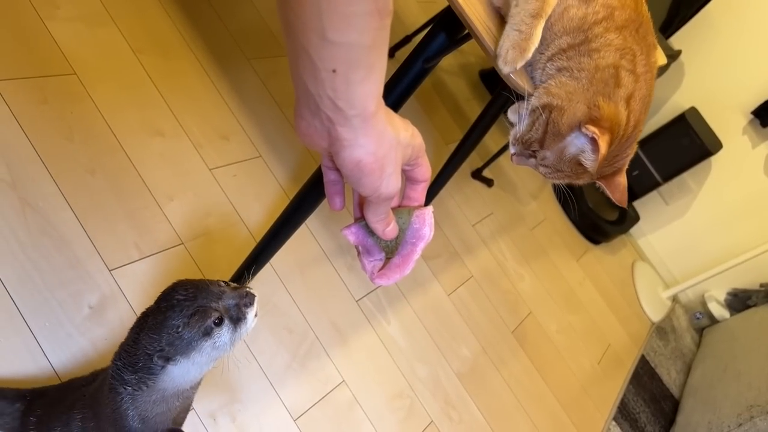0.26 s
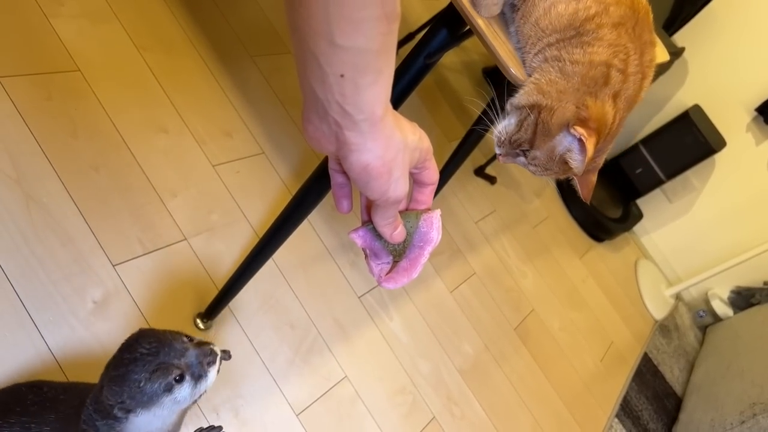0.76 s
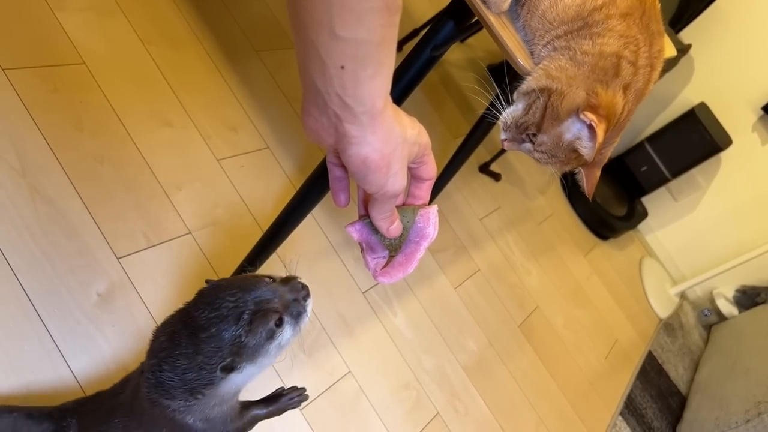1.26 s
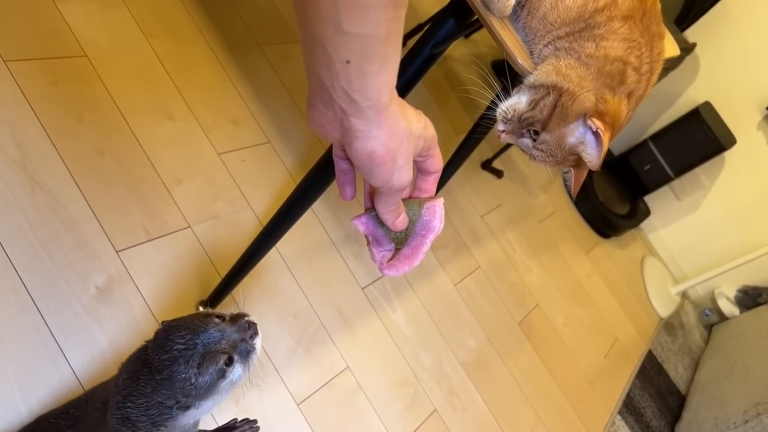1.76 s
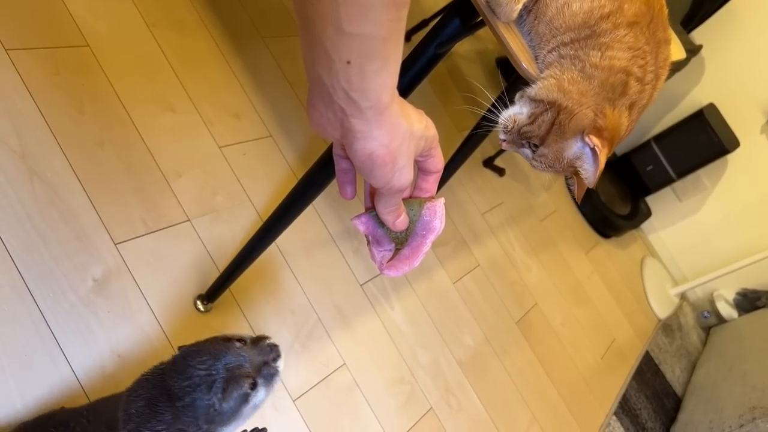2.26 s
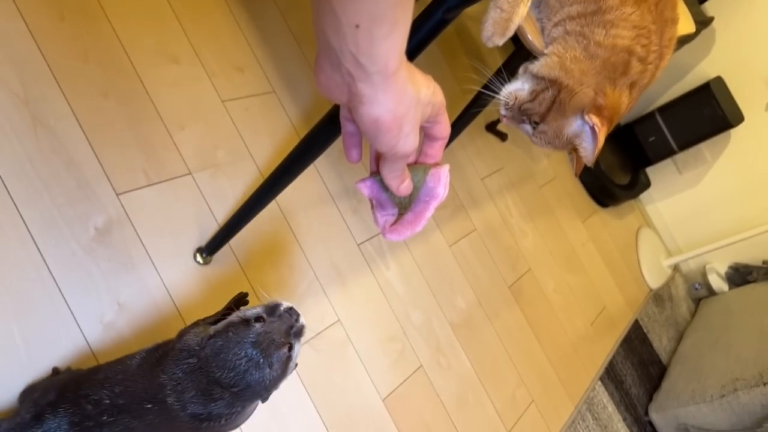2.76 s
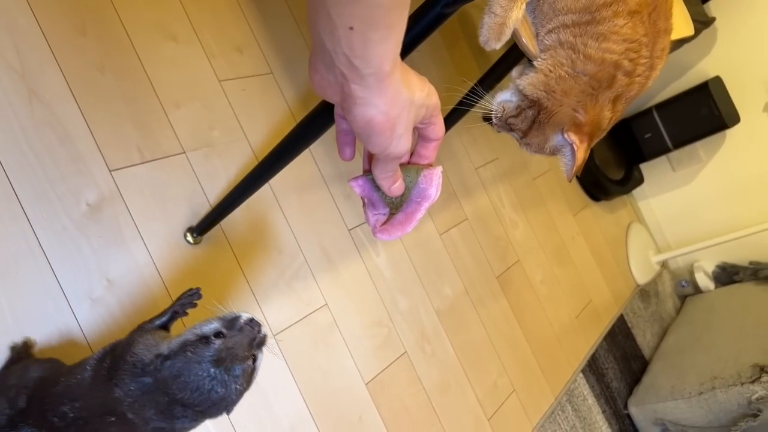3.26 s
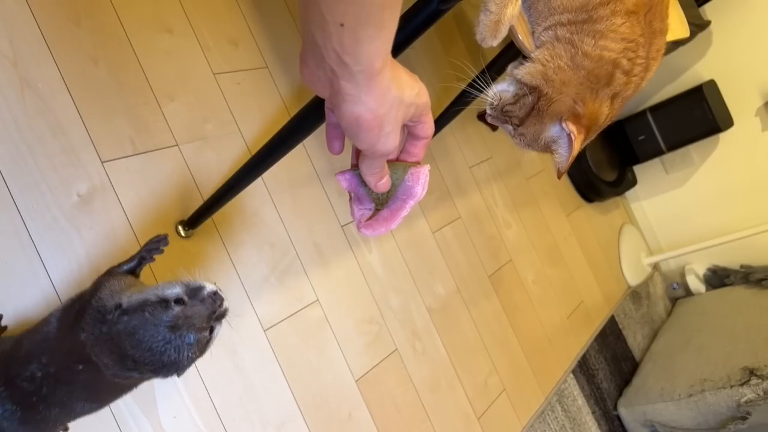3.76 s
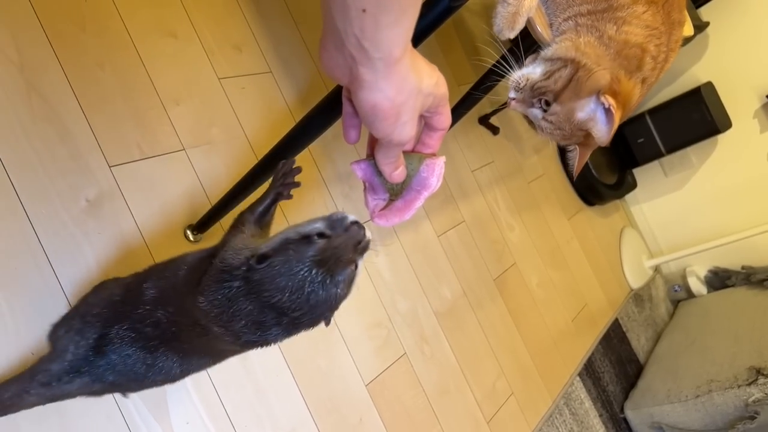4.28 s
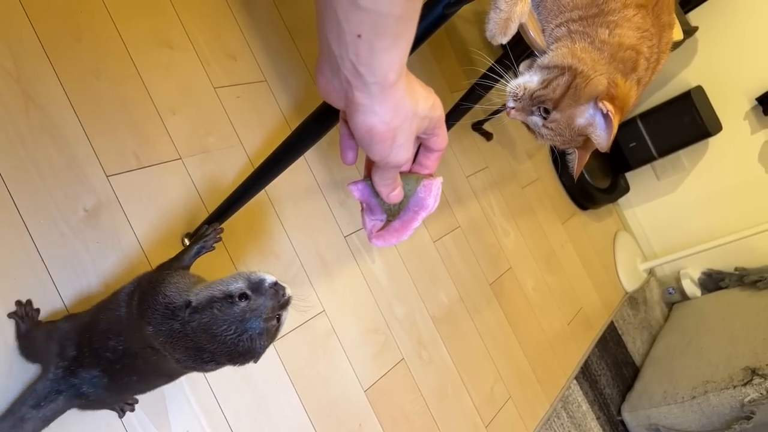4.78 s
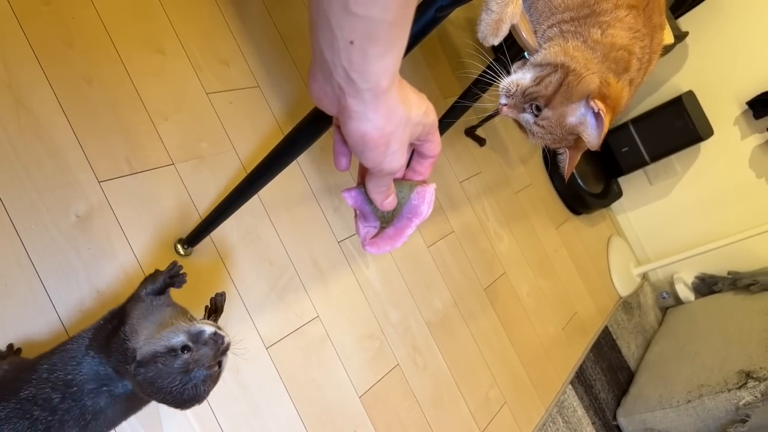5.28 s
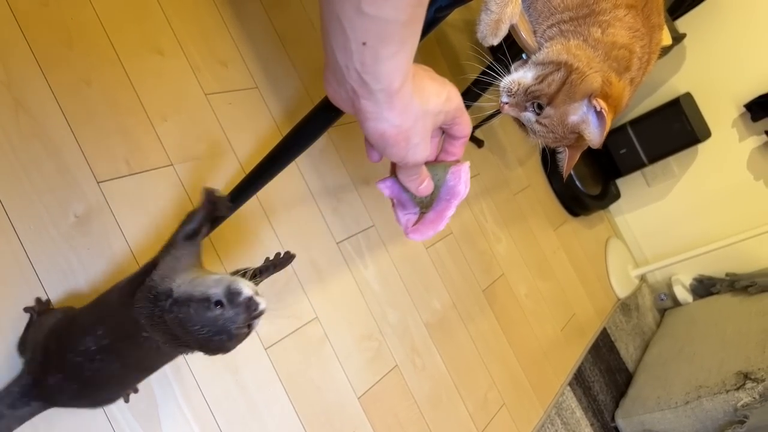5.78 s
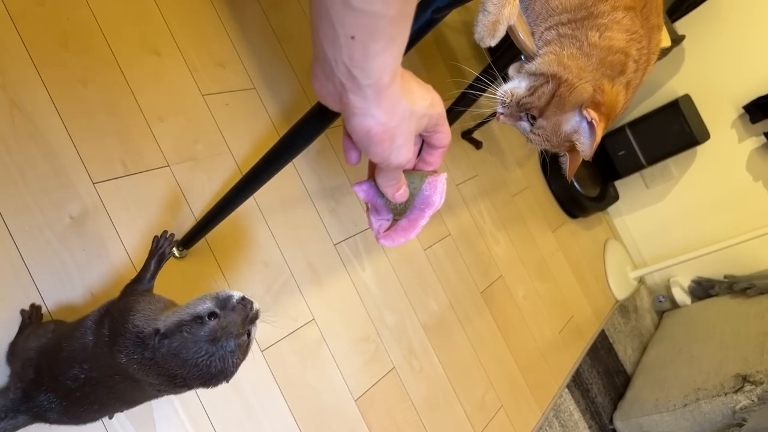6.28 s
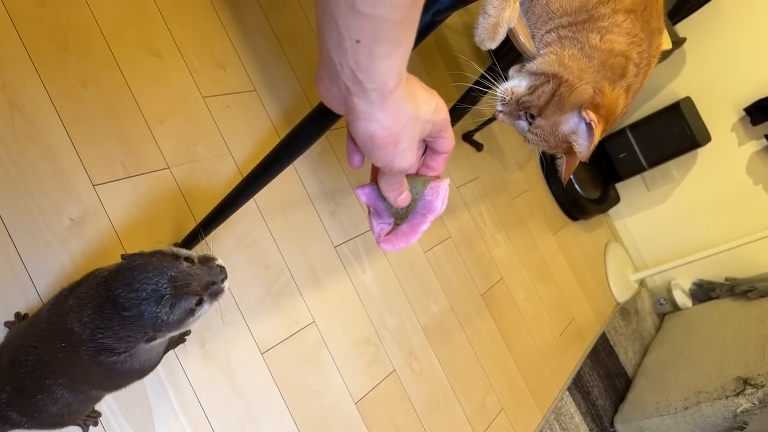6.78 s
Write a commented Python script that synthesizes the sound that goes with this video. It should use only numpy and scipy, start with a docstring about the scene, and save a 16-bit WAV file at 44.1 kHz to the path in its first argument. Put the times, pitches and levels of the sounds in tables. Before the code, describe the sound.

Repeated raspy, creaking squeals from a small otter in a quiet room, with dull paw thuds on wood and a last soft coo.

```python
"""Eleven rasping squeals from a small otter begging for food, a metre below the microphone in a quiet room.
Each snap of its vocal folds rings a mouth resonance near 3 kHz that sinks as the calls grow weak.
Its lips smack, and faint, sharp high ticks sound near the start of three squeals.
Paws thud and scuff on the wooden floor, over low ventilation noise.
After a last soft coo the sound stops dead, and only a faint hiss returns."""
import sys
import numpy as np
from scipy import signal
from scipy.fft import rfft, irfft, next_fast_len
from scipy.io import wavfile
from scipy.ndimage import uniform_filter1d

SR = 44100
rng = np.random.default_rng(int(sys.argv[2]) if len(sys.argv) > 2 else 0)


def unload_wav(signal):
    """Save mono or channel-first audio to the path in sys.argv[1] as 16-bit WAV at rate SR, clipped to [-1, 1]."""
    wavfile.write(
        sys.argv[1],
        SR,
        np.round(np.clip(np.atleast_2d(signal).T, -1, 1) * 32767).astype(np.int16),
    )


N = 310023

# One row per squeal: (level [dB], fade over call [dB], attack [s], release [s], push time [s],
# push width [s], push height [dB], chest [dB], rasp re level [dB], mouth resonance at onset [Hz],
# mouth resonance open [Hz], opening time [s])
SQUEAL_SHAPES = [ (-24, -2.5, 0.0097, 0.0088, 0.49, 0.14, 4, -38.5, -24, 2200, 2760, .018),
                 (-27, -1.5, 0.0073, 0.023, 0.937, 0.075, 5.5, -40.5, -19.5, 2400, 2744, 0.0059),
                 (-24.5, -4, 0.015, 0.018, 1.7, 0.079, 2, -38.5, -22, 2230, 2770, 0.021),
                 (-23.5, -1.5, 0.018, 0.0074, 2.285, 0.063, 2, -38, -21.5, 2190, 2854, 0.027),
                 (-24, 2, 0.009, 0.015, 2.83, 0.022, 0.5, -39, -20.5, 2430, 2780, 0.026),
                 (-26.5, -4.5, 0.0071, 0.012, 3.26, 0.011, 3, -39, -19.5, 2280, 2740, 0.028),
                 (-26.5, -2, 0.012, 0.052, 3.95, 0.18, 7, -39.5, -19.5, 1950, 2684, .03),
                 (-29.5, -0.5, 0.0054, 0.016, 4.46, 0.026, 5.5, -39.5, -26.5, 1720, 2774, 0.035),
                 (-27, -4.5, 0.018, 0.059, 5.3, 0.13, 6.5, -41.5, -18.5, 2400, 2660, 0.022),
                 (-32, -8, 0.0057, 0.063, 5.8, 0.059, 4.5, -39.5, -25, 2060, 2320, 0.015),
                 (-34, -7.5, 0.075, 0.022, 6.32, 0.019, 5, -45.5, -21, 2000, 2140, 0.11)]
# One list per squeal, shriek to creak: (time [s], pitch [Hz], roughness [0 clear, about 1 rough])
SQUEAL_GLIDES = [
    [(0.012, 288, 0.75), (0.034, 378, 0.2), (0.085, 365, .1), (0.115, 392, 0.04), (0.158, 379, 0.77),
     (0.205, 288.5, 0), (0.33, 283.8, 0.1), (0.39, 276.3, 0.46), (0.612, 254.4, 0.16)],
    [(0.82, 295.5, 0.2), (0.838, 284, 0.7), (0.852, 401.7, .45), (0.885, 247.8, 0.16), (0.95, 243, 0.52),
     (1.065, 263.4, 0), (1.09, 320, 0.54), (1.135, 296, 0.5)],
    [(1.378, 304, 1.16), (1.4, 289, .3), (1.438, 290.5, 0.4), (1.458, 401.8, 0.7), (1.51, 282.4, 0.6),
     (1.565, 272.2, 0.3), (1.6, 304.7, 0.9), (1.635, 272.8, 0.53), (1.755, 281.3, 0.54)],
    [(1.945, 275, 0.5), (1.975, 376.6, 0.34), (2.0, 378.5, 0.2), (2.015, 271.4, 0.7), (2.04, 290.5, 0.65),
     (2.056, 398.3, 0.1), (2.076, 378.4, 0.3), (2.115, 270.7, 0.65), (2.325, 291, 0.2)],
    [(2.555, 295, 0.88), (2.58, 366, 0.11), (2.615, 352, 0.5), (2.632, 387.4, 0.54), (2.655, 272, 0.13),
     (2.75, 269.2, 0.3), (2.772, 309.4, 0.58), (2.815, 259.8, 0.16), (2.895, 268, 0.88)],
    [(3.17, 282.5, .8), (3.184, 300, 0), (3.198, 383, 0.13), (3.215, 376.7, 0.48), (3.238, 322.6, 0.77),
     (3.262, 378.6, 0.4), (3.3, 350.3, 0.92), (3.36, 370.7, 0.77), (3.44, 306.6, 0.8)],
    [(3.61, 310, 1), (3.633, 311.6, 0.18), (3.65, 372, 0.3), (3.68, 360.8, 0.3), (3.705, 374.2, 0.3),
     (3.755, 252.8, 0.77), (3.85, 260.9, 0.47), (3.95, 249.6, 0.38), (4.105, 266.4, 0.6)],
    [(4.375, 438, 0.55), (4.387, 502.7, 0.2), (4.407, 584, 0.54), (4.423, 338, 0.9), (4.44, 295, 0.5),
     (4.46, 423, 0.65), (4.495, 441, 0.3), (4.522, 313, 0.2), (4.69, 290.8, 0.37)],
    [(4.905, 295.2, 0.9), (4.955, 271.3, .1), (5.03, 249.3, 0.6), (5.1, 243.5, 0.82), (5.16, 230.7, 0.65),
     (5.3, 237.4, 0.13), (5.395, 249.4, 0.26), (5.411, 317, 0.16), (5.435, 323, 0.5)],
    [(5.728, 472, 0.2), (5.742, 451.3, 0), (5.758, 446.7, 0.4), (5.772, 353, 1.1), (5.785, 452, 0.05),
     (5.81, 422.5, 0.7), (5.84, 370, 0.4), (5.866, 352.3, 0.77), (5.905, 375, 0.64)],
    [(6.21, 324, 0.8), (6.25, 298.6, 0.65), (6.284, 281, 0.65), (6.322, 334, 0), (6.36, 270, 0.9),
     (6.4, 316.7, 0.46), (6.46, 321.5, 0.86), (6.515, 276, 0.63), (6.585, 321, 0.93)],
]


def squeals():
    """The begging calls: trains of vocal-fold snaps through the vocal tract."""
    return sum(vocal_tract(*gesture(glide, *row)) for glide, row in zip(SQUEAL_GLIDES, SQUEAL_SHAPES))


def gesture(glide, level_db, fade_db, attack_s, release_s, push_at_s, push_s, push_db,
            chest_db, rasp_db, onset_hz, open_hz, opening_s):
    """Snap times and controls of one call: effort swells, pushes, lets go; the mouth opens and closes."""
    knots_s, knots_hz, knots_rough = np.transpose(glide)
    t = np.arange(knots_s[0], knots_s[-1], 1 / SR)
    age_s, left_s = t - t[0], t[-1] - t
    pitch_hz, rough = np.interp(t, knots_s, knots_hz), np.interp(t, knots_s, knots_rough)
    octaves = np.log2(pitch_hz / 300)
    surge_db = push_db * np.exp(-((t - push_at_s) / push_s) ** 2)
    effort_db = -20.5 * np.exp(-age_s / attack_s) + surge_db - 11.5 * np.exp(-left_s / release_s)
    db = level_db + effort_db + fade_db * (age_s / age_s[-1] - 0.5) + 11.5 * octaves
    shut = np.exp(-(age_s / opening_s) ** 2)
    closing = 1 - 0.073 * np.exp(-left_s / 0.067)
    mouth_hz = (open_hz + (onset_hz - open_hz) * shut) * closing
    # chest follows 40% of the effort; a half-open mouth passes more of it
    chest_rel_db = chest_db + 0.4 * effort_db + 0.5 * shut - db
    # rasp pivots on a middling squeal: -25 dB, 300 Hz, roughness 0.74
    rasp_rel_db = rasp_db + 0.71 * (db + 25) + 3 * octaves - 0.5 * (rough - 0.74)
    snap_s = fold_snaps(t, pitch_hz, rough)[:, None]
    controls = (db, pitch_hz, rough, mouth_hz, chest_rel_db, rasp_rel_db)
    return snap_s, [np.interp(snap_s, t, control) for control in controls]


def fold_snaps(t, pitch_hz, rough, memory=0.6, creak_hz=285, creak_span_hz=45):
    """Times at which the vocal folds snap shut; at low pitch they break into an uneven creak."""
    cycles = np.cumsum(pitch_hz) / SR
    index = np.searchsorted(cycles, np.arange(int(cycles[-1]) + 1))
    creak = np.clip((creak_hz - pitch_hz[index]) / creak_span_hz, 0, 1)
    jitter_periods = (0.002 + 0.028 * rough[index] + 0.016 * creak) * rng.standard_normal(len(index))
    slip_periods = signal.lfilter([1], [1, -memory], jitter_periods)  # a late snap delays the next few
    return t[index] + slip_periods / pitch_hz[index]


# Chest, mouth and upper resonances: (frequency [Hz], relative level [dB])
CHEST_SPECTRUM = [(60, -56.5), (170, 0), (245, 9), (300, 1), (400, 9), (520, -3), (650, -0.5), (800, 2),
                  (1100, 4.5), (1500, -6.5), (2100, -19), (4500, -72)]
MOUTH_SPECTRUM = [(700, -57), (1300, -14), (1800, -9), (2300, -0.5), (2560, 1), (2800, 7.5), (3100, -2.5),
                  (3450, 1), (3900, -9), (4600, -19.5), (7000, -60)]
RASP_SPECTRUM = [(3500, -26), (4800, -8), (5400, -0.5), (6100, -1), (6900, -13), (8500, -17.5),
                 (9600, -44.5), (11800, -17), (15500, -51)]


def vocal_tract(snap_s, controls, mouth_rest_hz=2780, flutter=0.014, shimmer_db=2.4,
                puff_db=-22, puff_s=0.00062, low_lag_s=0.001333, lag_hz=1700):
    """Each snap rings the chest, mouth and upper resonances, with a puff of treble turbulence."""
    db, pitch_hz, rough, mouth_hz, chest_db, rasp_db = controls
    size, count = 512, len(snap_s)
    hz, age_s = np.fft.rfftfreq(size, 1 / SR), np.arange(size) / SR
    force_spread, mouth_spread = rng.standard_normal((2, count, 1))
    mouth_scale = mouth_hz / mouth_rest_hz * (1 + flutter * rough * mouth_spread)
    chest = amp(chest_db) * unit_rms(amp(curve_at(CHEST_SPECTRUM, hz)))
    mouth = unit_rms(amp(curve_at(MOUTH_SPECTRUM, hz / mouth_scale)))
    rasp = amp(rasp_db) * unit_rms(amp(curve_at(RASP_SPECTRUM, hz)))
    ring = minimum_phase(np.sqrt(chest ** 2 + mouth ** 2 + rasp ** 2))
    ring *= np.exp(-2j * np.pi * low_lag_s * lag_hz * np.tanh(hz / lag_hz))  # lows lag: downward chirp
    puff = unit_rms(rfft(rng.standard_normal((count, size)) * np.exp(-age_s / puff_s)))
    drive = 1 + amp(puff_db) * puff * np.sqrt(rough) * np.minimum(hz / mouth_rest_hz, 2) ** 2
    force = amp(db + shimmer_db * rough * force_spread) * np.sqrt(SR / pitch_hz)
    start_s = np.floor(snap_s * SR) / SR
    subsample_delay = np.exp(-2j * np.pi * hz * (snap_s - start_s))
    pulses = force * irfft(ring * drive * subsample_delay)
    out = np.zeros(N)
    for at_s, pulse in zip(start_s[:, 0], pulses):
        add(out, at_s, pulse)
    return out


# Closed-mouth call: (time [s], level [dB], pitch [Hz])
COO_CONTOUR = [(6.756, -52, 339.7), (6.768, -45, 340), (6.787, -39, 305), (6.806, -34.5, 300),
               (6.831, -38.5, 318.6), (6.87, -38.5, 297)]


def coo(second_harmonic_db=-19, step_db=-6):
    """With the mouth shut the voice is nearly a sine."""
    knots_s, db, hz = np.transpose(COO_CONTOUR)
    t = np.arange(N) / SR
    phase = 2 * np.pi * np.cumsum(np.interp(t, knots_s, hz)) / SR
    overtones = sum(amp(second_harmonic_db + step_db * k) * np.sin((k + 2) * phase) for k in range(4))
    envelope = amp(np.interp(t, knots_s, db)) * (t > knots_s[0]) * (t < knots_s[-1])
    return envelope * (np.sin(phase) + overtones)


# Lips parting: (time [s], level [dB])
LIP_SMACKS = [(1.345, -65.5), (4.903, -43.5), (6.188, -59.5)]
# Smack colour: (frequency [Hz], relative level [dB])
LIP_SPECTRUM = [(300, -13), (1200, 4), (3000, 11), (6000, -8), (9000, -34), (15000, -47)]


def lip_smacks():
    """Tiny wet smacks as the lips part before a squeal."""
    return noise_bursts(LIP_SMACKS, LIP_SPECTRUM, t60_s=0.046)


# High ticks: (time [s], level [dB])
TREBLE_TICKS = [(1.974, -41.5), (2.564, -58), (4.369, -59)]
# Tick colour: (frequency [Hz], relative level [dB])
TICK_SPECTRUM = [(2000, -15), (6000, -0.5), (11000, -4.5), (15000, -18.5)]


def treble_ticks():
    """Faint, sharp high ticks near the start of three squeals."""
    return noise_bursts(TREBLE_TICKS, TICK_SPECTRUM, t60_s=0.022)


# Paw and body landings: (time [s], level [dB], slap re level [dB])
LANDINGS = [(0.562, -39.5, -20), (2.147, -40.5, -16), (2.691, -48, -24), (3.353, -48, 5),
            (3.896, -38, -7.5), (4.411, -22, -16), (4.444, -29.5, -12), (4.787, -43, -20), (4.97, -36, -23),
            (5.737, -19.5, -14), (5.763, -17, -5), (6.397, -40, -6.5)]
# Floor modes: (frequency [Hz], relative level [dB], T60 [s])
BOARD_MODES = [(70, 8.5, 0.31), (130, 0.5, 0.15), (197, -5.5, 0.26), (286.3, -20.5, 0.61), (362, -41.5, .2)]
# Paw slap: (frequency [Hz], relative level [dB])
SLAP_SPECTRUM = [(40, -21.5), (130, -5.5), (210, -4.5), (380, -8), (700, -21), (2000, -23.5), (8000, -54),
                 (14000, -86.5)]


def paw_thuds(rise_s=0.037, slap_rise_s=0.002, slap_t60_s=0.2, scatter=0.94):
    """Soft paws push the boards into their low modes; a dull slap scatters to both microphone ports."""
    t, out = np.arange(SR // 2) / SR, np.zeros((2, N))
    modes = sum(amp(db - 60 * t / t60_s) * np.sin(2 * np.pi * hz * t) for hz, db, t60_s in BOARD_MODES)
    boards = (1 - np.exp(-t / rise_s)) * modes
    for at_s, db, slap_db in LANDINGS:
        envelope = amp(slap_db - 60 * t / slap_t60_s) * np.minimum(t / slap_rise_s, 1)
        direct = noise(SLAP_SPECTRUM, len(t))
        for port in out:
            slap = envelope * (direct + scatter * noise(SLAP_SPECTRUM, len(t)))
            add(port, at_s, amp(db) * (boards + slap))
    return out


# Paw slides: (time [s], length [s], level [dB])
SCUFF_STROKES = [(3.19, 0.36, -55), (4.394, 0.48, -49.5), (5.678, 0.18, -72.5), (5.727, 0.25, -48.5),
                 (6.584, 0.097, -60)]
# Friction on wood: (frequency [Hz], relative level [dB])
SCUFF_SPECTRUM = [(1500, -28), (4000, 3.5), (8500, -3), (10000, -11), (11800, 7), (13500, -17),
                  (16000, -34)]


def paw_scuffs():
    """Claws and fur brush the boards in short, faint swishes."""
    t, envelope = np.arange(N) / SR, np.zeros(N)
    for at_s, length_s, db in SCUFF_STROKES:
        progress = np.clip((t - at_s) / length_s, 0, 1)
        envelope += amp(db) * np.sin(np.pi * progress ** 0.23)
    return envelope * noise(SCUFF_SPECTRUM, N)


# Calls run along the floor, so rasp arrives mostly reflected: (frequency [Hz], gain [dB])
REFLECTION_GAIN = [(200, -2), (1500, -2), (2800, 0), (6000, 4), (8500, 3), (12000, -8), (15000, -14)]


def reflections(t60_curve, delay_s, shared):
    """Sparse echoes of random sign, partly common to both ports; each band decays at its own rate."""
    size = SR // 2
    taps = rng.choice([-1., 1.], (3, size)) * (rng.random((3, size)) < 0.15)
    hz, t, bands = signal.stft(taps[:2] + shared * taps[2], SR, nperseg=128)
    decay = amp(-60 * t / curve_at(t60_curve, hz)[:, None])
    tail = signal.istft(bands * decay, SR, nperseg=128)[1][:, :size]
    tail *= np.arange(size) / SR > delay_s
    spectrum = rfft(tail)
    spectrum /= np.sqrt(uniform_filter1d(abs(spectrum) ** 2, size=300, axis=1))  # even scattering
    return irfft(spectrum * amp(curve_at(REFLECTION_GAIN, np.fft.rfftfreq(size, 1 / SR))), size)


# Wall reverberation: (frequency [Hz], T60 [s])
WALL_DECAY = [(100, 0.43), (300, 1), (1000, 0.31), (3000, 0.32), (6000, 0.33), (14000, 0.069)]


def room(x, near_db=-7.5, near_t60_s=0.04, far_db=-8):
    """Floor and furniture answer within milliseconds, the walls with a short tail."""
    near = amp(near_db) * reflections([(1000, near_t60_s)], delay_s=0.0009, shared=0.55)
    far = amp(far_db) * reflections(WALL_DECAY, delay_s=0.012, shared=0.73)
    return signal.fftconvolve(x[None], near + far, axes=1)[:, :N]


def room_boom(x, mode_hz=245.3, width_hz=5.9):
    """A standing wave booms when the creak's lowest harmonic sits on it."""
    return signal.lfilter(*signal.iirpeak(mode_hz, mode_hz / width_hz, fs=SR), x)


# Port phase gap: (frequency [Hz], left lead [rad])
PORT_PHASE = [(100, 0), (1000, .2), (1290, .9), (1550, .25), (1850, .25), (2300, -.35), (2760, -1.25),
              (3270, -.15), (3550, -.6), (3900, -.2), (4800, -1.4), (5800, 0), (9800, 0), (11300, -2.7),
              (12500, -3.14)]
# Port colour: (frequency [Hz], left over right [dB])
PORT_BALANCE = [(150, -2), (280, 0), (390, 4), (560, -5.5), (740, -5.5), (1010, -5), (1400, -1.5),
                (1880, 2), (2580, 1.5), (3520, -0.5), (4820, 3), (7000, 0)]
# Head direction: (time [s], left over right [dB])
HEAD_TURN = [(0.301, -0.7), (1.0, 0.5), (1.5, 0), (2.1, -0.3), (3.3, -1.5), (3.901, -0.3), (4.5, -0.8),
             (5.2, -.7), (5.8, 0.2)]


def microphone_ports(x):
    """Two ports hear the otter with different phase and colour; its head turns from side to side."""
    size = next_fast_len(N + 2048)
    hz = np.fft.rfftfreq(size, 1 / SR)
    left = np.exp(0.5j * curve_at(PORT_PHASE, hz)) * amp(curve_at(PORT_BALANCE, hz) / 2)
    stereo = irfft(rfft(x, size) * np.array([left, 1 / left]), size)[:, :N]
    pan = amp(np.interp(np.arange(N) / SR, *np.transpose(HEAD_TURN)) / 2)
    return stereo * np.array([pan, 1 / pan])


# Room air: (frequency [Hz], relative level [dB])
AIR_SPECTRUM = [(20, -29), (45, -6), (75, -4), (120, -6.5), (170, -4.5), (300, -8), (600, -15.5),
                (1200, -29.5), (2500, -33.5), (5000, -41), (9000, -51.5), (12000, -49.5), (14000, -73.5)]


def ventilation(air_db=-53, spread=0.13, hum_db=-56, hum_hz=99.4, hum_width_hz=5):
    """Low air noise, nearly alike in both ports, with a wavering hum."""
    common = noise(AIR_SPECTRUM, N)
    separate = np.array([noise(AIR_SPECTRUM, N) for _ in range(2)])
    hum_peak = 1 / (1 + ((np.fft.rfftfreq(N, 1 / SR) - hum_hz) / hum_width_hz) ** 2)
    hum = irfft(rfft(rng.standard_normal(N)) * hum_peak, N)
    return amp(air_db) * unit_rms(common + spread * separate) + amp(hum_db) * unit_rms(hum)


def amp(db):
    """Decibels to gain."""
    return 10 ** (np.asarray(db) / 20)


def unit_rms(x):
    """Scales to rms 1."""
    return x / np.sqrt(np.mean(abs(x) ** 2, axis=-1, keepdims=True) + 1e-20)


def curve_at(points, hz):
    """Interpolates on a log-frequency axis."""
    knots_hz, values = np.transpose(points)
    return np.interp(np.log(hz + 1), np.log(knots_hz), values)


def add(mix, at_s, sound):
    """Mixes a sound in at a given time."""
    part = mix[max(round(at_s * SR), 0):][:len(sound)]
    part += sound[:len(part)]


def noise(spectrum, size):
    """Noise of rms 1 with the given spectrum."""
    gain = amp(curve_at(spectrum, np.fft.rfftfreq(size, 1 / SR)))
    return unit_rms(irfft(rfft(rng.standard_normal(size)) * gain, size))


def noise_bursts(events, spectrum, t60_s):
    """One short, decaying burst per event."""
    t, out = np.arange(1024) / SR, np.zeros(N)
    for at_s, db in events:
        add(out, at_s, amp(db - 60 * t / t60_s) * noise(spectrum, len(t)))
    return out


def minimum_phase(gain):
    """Spectrum of the quickest ring with these magnitudes."""
    cepstrum = irfft(np.log(gain + 1e-7))
    half = cepstrum.shape[-1] // 2
    cepstrum[..., 1:half] *= 2
    cepstrum[..., half + 1:] = 0
    return np.exp(rfft(cepstrum))


def scene(squeal_gain_db=-2.0):
    """The otter and its footfalls in the room."""
    direct = amp(squeal_gain_db) * squeals() + lip_smacks() + treble_ticks()
    otter = direct + room(direct) + room_boom(direct) + coo() + paw_scuffs()
    return microphone_ports(otter) + paw_thuds() + ventilation()


def record(dry, low_cut_hz=42, high_cut_hz=15700, stop_s=6.862, hiss_at_s=6.96, hiss_db=-63):
    """The microphone sheds rumble; the sound stops dead, a faint hiss fades in; all is band-limited."""
    t = np.arange(N) / SR
    highpassed = signal.sosfilt(signal.butter(3, low_cut_hz, "high", fs=SR, output="sos"), dry)
    gate = np.clip((stop_s - t) / 0.0017, 0, 1)
    hiss = amp(hiss_db) * noise(AIR_SPECTRUM, N) * np.clip((t - hiss_at_s) / 0.036, 0, 1)
    lowpass = signal.firwin(511, high_cut_hz, window=("kaiser", 9), fs=SR)
    return signal.oaconvolve(highpassed * gate + hiss, lowpass[None], "same")


dry = scene()
out = record(dry)
unload_wav(out)
```